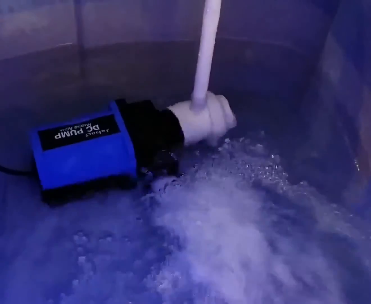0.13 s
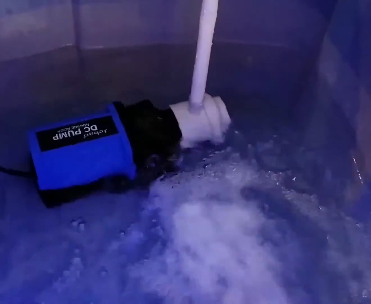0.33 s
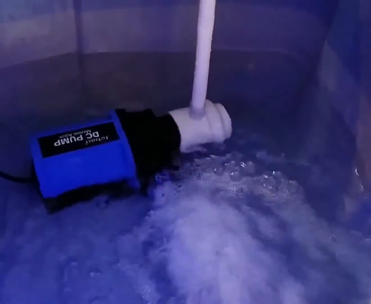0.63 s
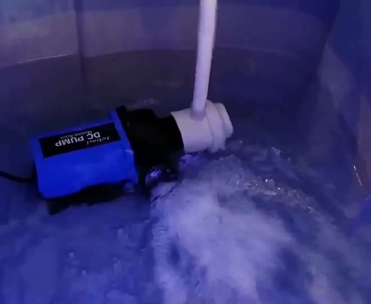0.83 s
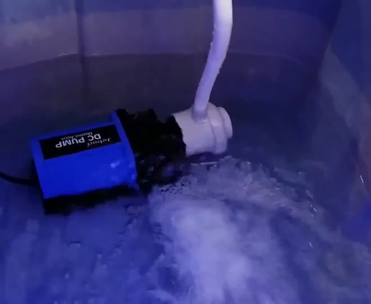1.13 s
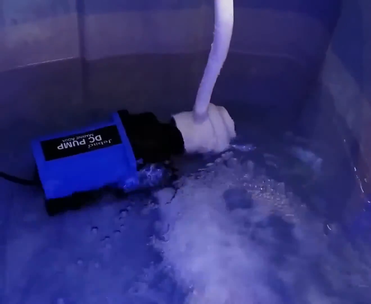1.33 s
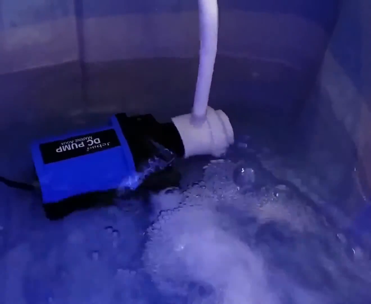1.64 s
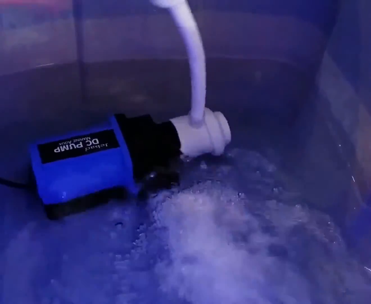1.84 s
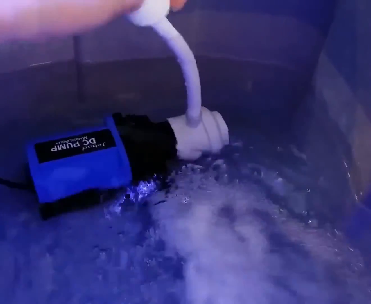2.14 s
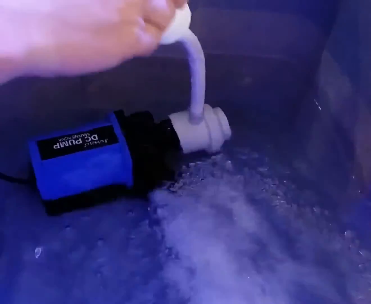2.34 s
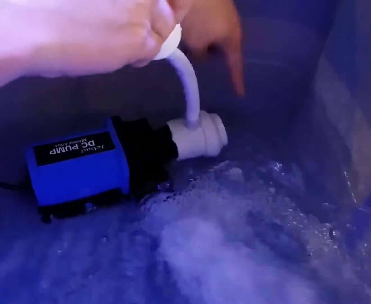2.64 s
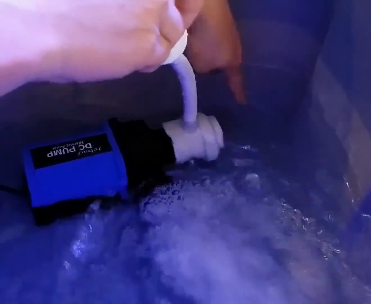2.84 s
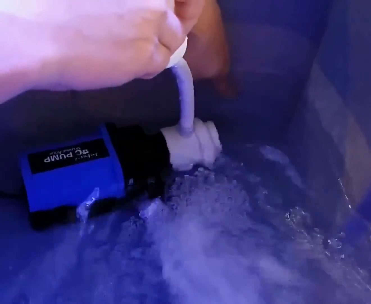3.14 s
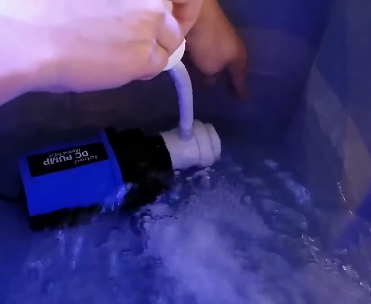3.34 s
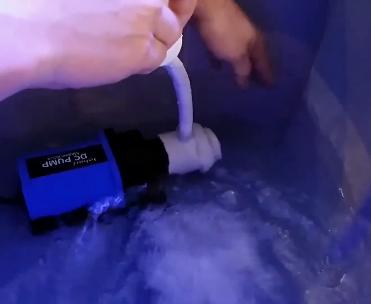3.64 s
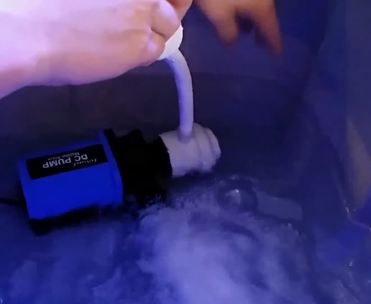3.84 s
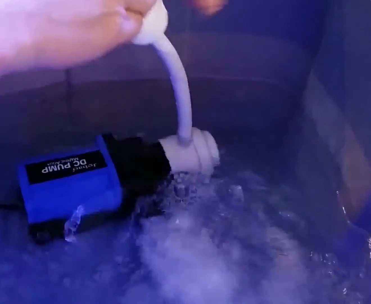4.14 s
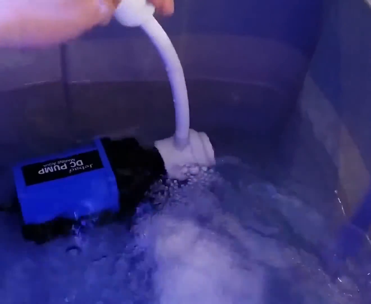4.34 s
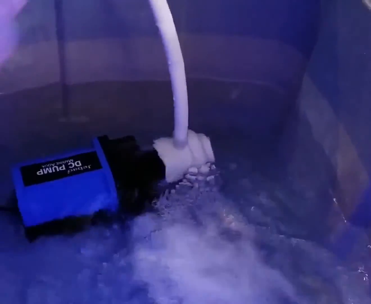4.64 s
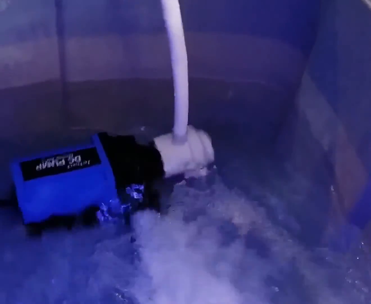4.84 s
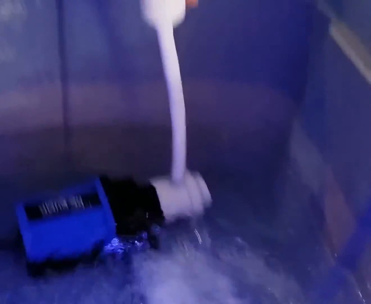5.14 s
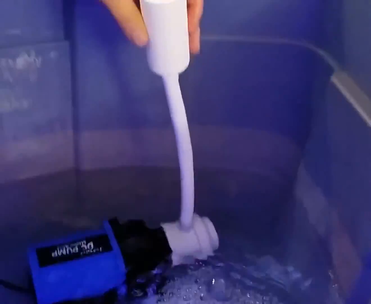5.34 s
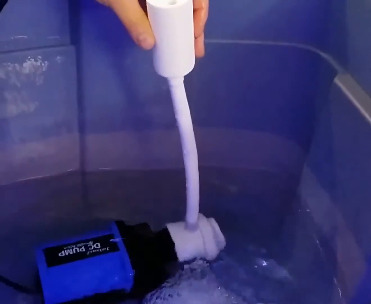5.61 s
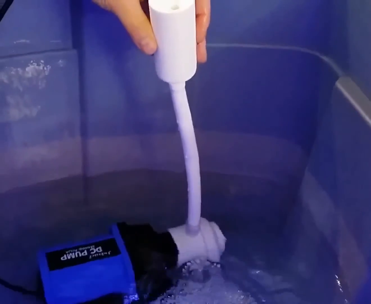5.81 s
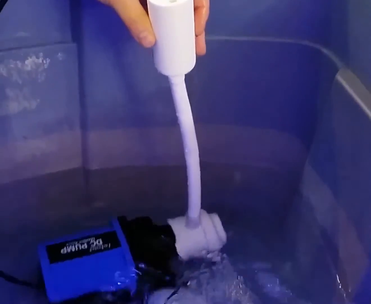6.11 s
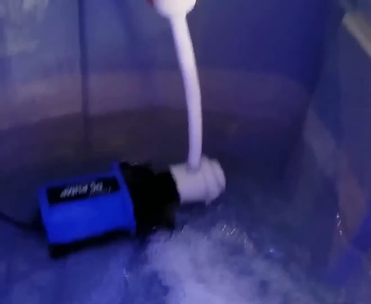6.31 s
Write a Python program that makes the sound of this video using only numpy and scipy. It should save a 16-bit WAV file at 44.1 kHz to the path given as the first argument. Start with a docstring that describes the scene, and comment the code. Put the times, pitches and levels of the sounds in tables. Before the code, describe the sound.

A small pump runs in a plastic tub of water, heard close and slightly right of centre, with quick wall echoes and a faint room tail. Throughout, a bubble jet rumbles low and unevenly, the housing whirrs, the motor sings thinly with a slight waver, and foam hisses with tiny pips. From 0 to 2 seconds, gulps of air snap, spurt and ring in short gargling rattles, densest around 1.2 to 1.4 and 1.75, with small slaps and splashes. From about 2 to 4.5 it is calmer: steady churning, soft low thumps near 2.4, 2.9 and 4.1, a few high ticks and faint bubbles. Shortly after 4.6 the crackly gargling returns, thick until about 5.3, then sparser with a splash near 5.7. From 6.0 to the end at about 6.5, a deep thump, gargles and rapid wet slaps crowd together.

```python
"""A small submersible pump runs in a plastic tub of water and sucks air down a hose.
From start to end its bubble jet rumbles (shaped noise), the housing whirrs, the motor sings and foam fizzes.
Gulps of air snap and ring in gargling bursts in the first two seconds; then it is calmer, with low thumps.
Shortly after 4.5 s the gargling returns, and from about 6 s water also slaps over the intake in quick
succession. Bubbles are short dying tones, splashes are bursts of noise, and the tub walls echo them."""
import sys
import numpy as np
from scipy import signal
from scipy.fft import rfft, irfft, next_fast_len
from scipy.io import wavfile
from scipy.ndimage import uniform_filter1d

SR = 44100
rng = np.random.default_rng(int(sys.argv[2]) if len(sys.argv) > 2 else 0)


def transcribe(signal):
    """Save signal, clipped to [-1, 1], as a 16-bit WAV file at the path in sys.argv[1]."""
    frames = np.atleast_2d(signal).T
    limited = np.clip(frames, -1, 1)
    pcm = np.round(limited * 32767).astype(np.int16)
    wavfile.write(sys.argv[1], SR, pcm)


N = 285229
T = np.arange(N) / SR
HZ = np.fft.rfftfreq(next_fast_len(N, True), 1 / SR)

# tone colour of the bubble jet: f/Hz, level/dB per Hz
JET_COLOUR = [(20, -33), (48, -32.5), (70, -17), (92, -16.5), (112, -11), (126, -14.5), (152, -5.5),
              (186, -3), (220, -7.5), (295, -2), (325, 1.5), (370, -4.5), (410, -14), (520, -22),
              (680, -36.5), (1300, -42.5)]
# tone colour of the sharp snap when air pinches off: f/Hz, level/dB per Hz
PINCH_COLOUR = [(400, -8), (1300, -29), (2300, -22), (4000, -42), (5500, 3), (8200, 5), (10500, -8.5),
                (16000, -25)]
# tone colour of splashing water: f/Hz, level/dB per Hz
SPLASH_COLOUR = [(200, -6), (520, 0), (800, -9.5), (1300, -12.5), (1750, -0.5), (2300, -0.5), (3000, -7),
                 (4000, -6), (5000, -36), (7000, -47)]
# the hose and the impeller chamber colour every burst of air: f/Hz, level/dB per Hz
CHAMBER_COLOUR = [(600, -48), (1400, -9), (1850, -10), (2400, 11), (3000, -11), (3800, 9), (5000, 10),
                  (7000, 7.5), (12000, -21.5)]
# how much air the jet carries, before each source takes its share: t/s, level/dB
AIR_FLOW = [(0, 1), (0.6, -0.5), (1.1, -1), (1.8, 1), (2.3, -2.5), (3.1, -1.5), (3.9, 3), (4.4, 2.5),
            (5.15, 0), (5.7, 0.5), (6.3, 0.5), (6.47, -2)]
FLOW_DB = np.interp(T, *np.transpose(AIR_FLOW))


def churn(low_db=-29.0, high_db=-32.0, split_hz=250, steadiness=0.92):
    """The bubble cloud pulsates at random; its modes follow the flow, and shift up or down in each surge."""
    # moments when the jet surges: start t/s, length t/s, change of lower modes level/dB, of upper modes level/dB
    surges = [(0.224, 0.022, -1.5, 9), (1.92, 0.21, 3, 4), (2.562, 0.12, 5, 4), (3.21, 0.5, 1.5, 0.5),
              (6.08, 0.16, 2, -2)]
    surge_db = np.zeros((2, N))
    for s, length, *changes_db in surges:
        surge_db += np.outer(changes_db, spell(T - s, length))
    shape = gain_of(read(JET_COLOUR))
    upper = 1 / (1 + (split_hz / (HZ + 1)) ** 12)
    out = np.zeros((2, N))
    for part, db in [(1 - upper, low_db + surge_db[0]), (upper, high_db + surge_db[1])]:
        cloud = noise(shape * np.sqrt(part))
        # the pump feeds the cloud at an even rate, so slow level changes are mostly levelled out
        slow_power = uniform_filter1d(cloud[0] ** 2, SR // 10) + 1e-6
        steady = evened(cloud / slow_power ** (steadiness / 2))
        out += steady * gain_of(FLOW_DB + db)
    return out


def gulps(ring_db=-9.5, spurt_db=-8.0, snap_db=5.0, snap_s=0.00097, spurt_s=0.00048, spatter_db=-4.0, reach=1.87):
    """A slug of air pinches off with a sharp snap, spurts through the chamber and leaves a ringing bubble."""
    # single gulps, levels before the settings above: t/s, level/dB, bubble pitch f/Hz, snap level/dB
    slugs = [(0.0665, -8, 5060, -22), (0.2669, -18.5, 2060, -20), (0.3004, -8, 4400, -16.5),
             (0.4236, -11.5, 5440, -27), (0.4404, -14.5, 5950, -23.5), (0.4544, -13.5, 3960, -27),
             (0.5847, -16.5, 2360, -41), (0.6115, -16, 3430, -30), (0.6264, -20.5, 2350, -35),
             (0.6435, -22, 4700, -45), (0.9918, -12, 5150, -31), (1.1546, -8.5, 3344, -19.5),
             (1.167, -4, 4500, -32), (1.1834, -10, 3800, -33), (1.1915, -15, 4300, -24),
             (1.2031, -14, 4060, -26), (1.2125, -22, 3980, -25), (1.262, -10, 3620, -24.5),
             (1.276, -10, 3540, -23), (1.3775, -12, 3240, -15.5), (1.4654, -32, 2270, -27),
             (1.492, -32, 2300, -21.5), (1.7442, -7.5, 3730, -15.5), (1.7745, -9.5, 3580, -19),
             (1.7835, -10, 3580, -20), (1.7925, -16, 3540, -18), (1.8543, -11, 3610, -50),
             (2.176, -22, 1890, -23), (4.283, -17, 1930, -32), (4.5895, -9.5, 8500, -26),
             (4.5974, -23, 5800, -22), (4.7833, -20, 2620, -19.5), (4.7941, -14, 5300, -27),
             (4.8075, -27, 2360, -24), (4.857, -8.5, 4570, -19), (4.8653, -6, 4240, -22),
             (4.9275, -13, 2680, -34), (4.9365, -11, 4300, -26), (5.0632, -13.5, 2980, -29),
             (5.0885, -15, 2680, -39), (5.1065, -14, 2400, -28), (5.119, -16, 2260, -19.5),
             (5.1305, -12, 3850, -18), (5.1438, -27, 2280, -21), (5.182, -17, 2300, -23.5),
             (5.1894, -13, 2390, -17), (5.209, -11.5, 3080, -40), (5.3105, -13.5, 4050, -50),
             (5.9308, -12, 2700, -53), (6.0378, -22, 3900, -19.5), (6.21, -4.5, 5040, -47),
             (6.2652, -9, 4500, -15), (6.277, -10, 4560, -28.5), (6.316, -4.5, 1754, -48),
             (6.3975, -23, 3530, -24.5)]
    bodies, snaps, spurts = np.zeros((3, 5, N))  # five spots on the water
    t = np.arange(SR // 60) / SR
    bursts = np.sign(rng.standard_normal((len(slugs), 2, len(t))))
    delays = rng.uniform(0.0096, 0.016, len(slugs))
    for k, (s, level_db, hz, crack_db) in enumerate(slugs):
        spot = k % len(bodies)
        spurt = gain_of(level_db + spurt_db) * bursts[k, 0] * np.exp(-t / spurt_s)
        cutoff_hz = min(reach * hz, 0.45 * SR)  # larger slugs sound duller
        spurt = signal.lfilter(*signal.butter(2, cutoff_hz, fs=SR), spurt)
        ring = bubble(hz, cycles=9.0, rise=-0.038)
        add(bodies[spot], s, gain_of(level_db + ring_db) * ring)
        add(spurts[spot], s, spurt)
        add(spurts[spot], s + delays[k], gain_of(spatter_db) * spurt)  # the tail of the slug follows
        add(snaps[spot], s, gain_of(crack_db + snap_db) * bursts[k, 1] * np.exp(-t / snap_s))
    air = bodies + colour(spurts, CHAMBER_COLOUR)
    body = tub(air, walls_db=-2.5, walls_t60=0.05, room_db=-11, room_t60=0.4)
    snap = tub(colour(snaps, PINCH_COLOUR), walls_db=-5, walls_t60=0.04, room_db=-12, room_t60=0.3)
    return body + snap


def gargle(ring_db=-4.5, spray_db=-3.5, snap_db=-9.5, per_s=1200, spread_db=3.0, scatter=0.138):
    """The impeller chops incoming air into a rattle of small bubbles, each a snap, a spurt and a short ring."""
    rings, snaps = np.zeros((2, 2, N))
    draws = rng.random((int(per_s * N / SR), 4))
    times = draws[:, 0] * N / SR
    air, pitch = air_intake()
    pitches = np.interp(times, T, pitch)
    for k, (s, hz, (_, size, a, b)) in enumerate(zip(times, pitches, draws)):
        hz *= np.exp(2 * scatter * (a - b))
        hz *= 1.62 if k % 3 == 0 else 0.96  # some split off as smaller bubbles
        strength = gain_of(spread_db * min(-np.log(size), 3)) * (-1) ** k
        ring = bubble(hz, cycles=7.6, rise=0.015)
        spot = int(2 * a)
        add(rings[spot], s, strength * ring / np.linalg.norm(ring))
        add(snaps[spot], s, np.array([strength]))
    snaps = evened(snaps)
    rattle = gain_of(ring_db) * evened(rings)
    rattle += gain_of(spray_db) * colour(snaps, CHAMBER_COLOUR)
    rattle += gain_of(snap_db) * colour(snaps, PINCH_COLOUR)
    rattle *= air * chop() / 2
    return tub(rattle, walls_db=0.0, walls_t60=0.05, room_db=-13.0, room_t60=0.34)


def air_intake(trickle_db=-52.5, trickle_hz=4100, sag_octaves_per_s=2.9):
    """Strength and bubble pitch of the air: a steady trickle plus runs, the strongest weighing most in the pitch."""
    # runs of air that the impeller swallows: start t/s, length t/s, level/dB, pitch halfway through f/Hz
    air_runs = [(-0.015, 0.043, -30, 3210), (0.093, 0.084, -38.5, 2720), (0.264, 0.07, -37, 2620),
                (0.427, 0.038, -32, 3760), (0.602, 0.051, -34.5, 2880), (0.761, 0.074, -37, 4200),
                (1.001, 0.017, -33, 3750), (1.151, 0.09, -32, 2740), (1.317, 0.11, -34, 2140),
                (1.348, 0.085, -31.5, 3060), (1.412, 0.085, -36, 2330), (1.715, 0.048, -31.5, 3280),
                (1.772, 0.031, -29, 3110), (3.925, 0.09, -44, 3930), (4.137, 0.03, -44, 3750),
                (4.621, 0.014, -31, 2590), (4.772, 0.027, -26.5, 2680), (4.908, 0.029, -28.5, 2810),
                (5.079, 0.15, -27.5, 2460), (5.218, 0.11, -35.5, 2290), (5.751, 0.043, -32.5, 2540),
                (6.037, 0.11, -31.5, 2310), (6.182, 0.12, -30.5, 2380), (6.287, 0.17, -37.5, 1900)]
    power = np.full(N, gain_of(trickle_db) ** 2)
    pitch = power * trickle_hz
    for s, length, db, hz in air_runs:
        run = (gain_of(db) * spell(T - s, length)) ** 2
        from_middle = np.clip(T - s, 0, length) - length / 2
        power += run
        pitch += run * hz * 2 ** (-sag_octaves_per_s * from_middle)  # bubbles grow, so their pitch sags
    return np.sqrt(power), pitch / power


def chop(per_s=80, jitter=0.3, decay_s=0.0026, floor=0.27):
    """The impeller bites the air off in uneven pulses: a gain of rms 1 that jumps at each bite and falls back."""
    gaps = np.exp(jitter * rng.standard_normal(1500)) / per_s
    bites = np.cumsum(gaps) - gaps[0]
    age = T - bites[np.searchsorted(bites, T, "right") - 1]
    return evened(floor + np.exp(-age / decay_s))


def thumps(db=-2.0):
    """Large air pockets break off and ring for a cycle or two inside the bubble cloud."""
    # large pockets, levels before db and the jet's colour: t/s, level/dB, pitch f/Hz
    big_pockets = [(1.295, -9, 182), (1.933, -5.5, 173), (2.376, -8.5, 185), (2.87, -8.5, 165),
                   (3.852, -9, 307), (4.074, -3.5, 166), (4.755, -5.5, 275), (5.757, -7.5, 244),
                   (6.091, -2.5, 207)]
    out = np.zeros(N)
    for s, level_db, hz in big_pockets:
        pocket = bubble(hz, cycles=2.16, rise=0.0082)
        onset = 1 - np.exp(-np.arange(len(pocket)) * hz / SR * 4)
        add(out, s, gain_of(level_db + db) * pocket * onset)
    return filtered(out, gain_of(read(JET_COLOUR)))


def slaps(cycles=7.6, scatter=0.04, stagger_s=0.0015, splat_db=-7.5, splat_s=0.0028):
    """Water slaps shut over the intake: a short splat, and a trapped air pocket of varying size that rings."""
    # single slaps: t/s, lower modes level/dB, upper modes level/dB
    slap_times = [(0.221, -29, -33), (0.558, -36, -29.5), (1.3149, -23, -27), (1.3637, -20, -27),
                  (5.209, -26, -27), (6.0378, -27, -24), (6.0496, -19, -21), (6.0647, -14, -23),
                  (6.0784, -26, -30), (6.1033, -19, -21), (6.1164, -19.5, -24), (6.128, -23.5, -20),
                  (6.1836, -21, -16), (6.1954, -21, -24), (6.2287, -25, -21), (6.2468, -19, -25),
                  (6.277, -20, -25), (6.2844, -18, -31), (6.316, -15, -30), (6.342, -20, -29),
                  (6.39, -22, -30)]
    # lower modes of the air pocket, levels within a slap: f/Hz, level/dB
    lower_modes = [(1850, -2.5), (2330, -9.5)]
    # upper modes of the air pocket, levels within a slap: f/Hz, level/dB
    upper_modes = [(3200, -8), (3800, 1), (4500, -4), (5100, -1.5)]
    rings, splats = np.zeros((2, 3, N))  # three spots on the water
    t = np.arange(SR // 40) / SR
    for k, (s, lower_db, upper_db) in enumerate(slap_times):
        spot = k % len(rings)
        for modes, level_db in [(lower_modes, lower_db), (upper_modes, upper_db)]:
            for hz, db in modes:
                ring = bubble(hz * np.exp(scatter * rng.uniform(-0.94, 1)), cycles, rise=0)
                add(rings[spot], s + stagger_s * rng.random(), gain_of(level_db + db) * ring)
        splat = rng.standard_normal(len(t)) * np.exp(-t / splat_s)
        add(splats[spot], s, gain_of((lower_db + upper_db) / 2 + splat_db) * splat)
    water = rings + colour(splats, SPLASH_COLOUR)
    return tub(water, walls_db=-4, walls_t60=0.045, room_db=-13, room_t60=0.34)


def slop(db=10.0, lapping_db=-68):
    """Lumpy splashing where the surface folds over against the pump, with faint lapping in between."""
    # splashes, levels before db: start t/s, length t/s, level/dB
    splashes = [(1.336, 0.15, -54.5), (1.768, 0.13, -47.5), (5.187, 0.41, -55.5), (5.657, 0.32, -51.5),
                (6.043, 0.091, -41), (6.19, 0.2, -41.5)]
    level = np.full(N, gain_of(lapping_db))
    for s, length, level_db in splashes:
        level += gain_of(level_db) * spell(T - s, length)
    water = noise(gain_of(read(SPLASH_COLOUR)))
    return water * level * gain_of(db) * lumpy(depth_db=8.0, rate_hz=26)


def glugs(cycles=9.1, damping=0.22):
    """Single bubbles surface, some with a clear note, the tiniest as short high ticks."""
    # surfacing bubbles: t/s, level/dB, pitch f/Hz
    surfacing_bubbles = [(0.056, -26, 2760), (0.122, -26, 3230), (0.133, -19, 7200), (1.522, -25, 4100),
                         (1.691, -28, 4500), (1.734, -15, 6240), (2.95, -16, 10000), (3.329, -21, 9700),
                         (2.994, -34, 1910), (3.49, -35, 2400), (3.612, -33, 856), (3.66, -35, 866),
                         (3.689, -13.5, 7600), (3.709, -35, 2250), (3.84, -27, 4430), (3.976, -23, 3980),
                         (4.225, -32, 1900), (4.86, -23, 1906), (5.071, -27, 2720), (6.302, -22, 2670)]
    out = np.zeros((1, N))
    for s, level_db, hz in surfacing_bubbles:
        size = 3000 / hz  # 1 for a bubble that rings at 3000 Hz
        add(out, s, gain_of(level_db) * bubble(hz, cycles * size ** damping, rise=0.0074))
    return tub(out, walls_db=-5.0, walls_t60=0.045, room_db=-15.0, room_t60=0.3)


def whirr(db=-3.5, flow_share=1.4, count=3):
    """Turbulence in the impeller keeps the housing humming, harder with the flow; resonances waver in groups."""
    # resonances of the pump housing, levels before db and flow: f/Hz, width f/Hz, level/dB
    resonances = [(568, 19, -54.5), (832, 35, -57.5), (914, 34, -55), (1123, 110, -57.5),
                  (1445, 120, -55.5), (1780, 40, -53.5), (1960, 68, -52.5), (2600, 130, -53.5),
                  (4000, 770, -52)]
    out = np.zeros((2, N))
    for k in range(count):
        power = np.zeros(len(HZ))
        for hz, width, level_db in resonances[k::count]:
            peak = 1 / (1 + ((HZ - hz) / width) ** 2) ** 1.44
            power += (gain_of(level_db) * evened(peak)) ** 2
        hum = noise(np.sqrt(power)) * np.sqrt(np.mean(power))
        out += hum * lumpy(depth_db=4.0, rate_hz=18)
    return out * gain_of(db + flow_share * FLOW_DB)


def whine(db=0.0, waver=0.00602, flow_share=1.2):
    """The motor sings faintly, louder with the flow; its speed wavers a little at random."""
    # tones of the running motor, levels before the flow: f/Hz, level/dB
    motor_tones = [(565, -74), (910, -62.5), (1056, -66), (1100, -63.5), (4430, -61)]
    speed = 1 + waver * drift(21.0)
    turns = np.cumsum(speed) / SR
    out = np.zeros(N)
    for hz, level_db in motor_tones:
        tone = np.sin(2 * np.pi * (hz * turns + rng.random()))
        out += gain_of(level_db) * evened(tone * lumpy(depth_db=7.5, rate_hz=13.0))
    return out * gain_of(db + flow_share * FLOW_DB)


def foam(db=-46.0, flow_share=0.033, hiss_db=4.5, pops_db=-0.5, per_s=300, spread_db=1.0, tiniest_hz=9700):
    """Countless tiny bubbles burst as a hiss; the nearer ones are separate pips."""
    # tone colour of the foam's hiss: f/Hz, level/dB per Hz
    fizz_colour = [(300, 7), (650, 5.5), (1100, 6), (1300, 0.5), (1650, -1), (2200, 3.5), (3200, 5),
                   (4500, 4), (5600, -0.5), (7500, 1.5), (9400, 0.5), (11000, -3.5), (16000, -11.5)]
    froth = noise(gain_of(read(fizz_colour)))
    froth = tub(froth, walls_db=2.0, walls_t60=0.059, room_db=-4.5, room_t60=0.57)
    hiss = evened(froth) * gain_of(hiss_db) * lumpy(depth_db=2.3, rate_hz=230)
    spots = np.zeros((4, N))
    for k, (when, pitch, size) in enumerate(rng.random((int(per_s * N / SR), 3))):
        pip = bubble(tiniest_hz / (1 + 1.8 * pitch), cycles=13, rise=0.015)
        add(spots[k % len(spots)], when * N / SR, pip * gain_of(spread_db * min(-np.log(size), 4)))
    pops = evened(tub(spots, walls_db=6.0, walls_t60=0.04, room_db=-14.0, room_t60=0.27))
    return (hiss + gain_of(pops_db) * pops) * gain_of(db + flow_share * FLOW_DB)


def tub(spots, walls_db, walls_t60, room_db, room_t60):
    """Each spot on the water has its own quick echoes from the tub walls, then a faint room tail."""
    t = np.arange(SR // 3) / SR
    out = np.zeros((2, N))
    for spot in spots:
        dense, chance = rng.standard_normal((2, len(t))), rng.random((2, len(t)))
        # sparse clicks for the walls, dense noise for the room; each falls 60 dB in its t60 seconds
        walls = np.sign(dense) * (chance < 0.07) * (t > 0.0008) * gain_of(-60 * t / walls_t60)
        room = dense * (t > 0.008) * gain_of(-60 * t / room_t60)
        echo = np.zeros((2, len(t)))
        for db, part in [(walls_db, walls), (room_db, room)]:
            echo += gain_of(db) * part / np.linalg.norm(part, axis=1, keepdims=True)
        echo[0, rng.integers(1, 4)] += 1
        echo[1, 0] += 1  # the direct sound reaches the right side first
        out += signal.oaconvolve(spot[None], echo, axes=1)[:, :N]
    return out


def bubble(hz, cycles, rise):
    """A bubble's ring fades by 1/e in the given cycles; its pitch climbs (or sinks, if rise is negative)."""
    age = np.arange(int(6 * cycles / hz * SR)) * hz / SR / cycles
    return np.exp(-age) * np.sin(2 * np.pi * cycles * (age + rise * age ** 2 / 2))


def spell(age, length, attack_s=0.011, hold_rise_db_per_s=1, release_s=0.0258):
    """Envelope of a run of air or water: fast attack, a very slightly rising hold that goes on, then a release."""
    age = np.maximum(age, 0)
    attack = np.minimum(age / attack_s, 1)
    release = np.exp(-np.maximum(age - length, 0) / release_s)
    return attack * gain_of(hold_rise_db_per_s * age) * release


def noise(gain):
    """Stereo noise of the given spectrum: alike in the bass, unrelated in the treble."""
    # how alike left and right are: f/Hz, likeness (1 = the same, 0 = unrelated)
    likeness = [(25, 0.9), (70, 0.99), (290, 0.96), (640, 1), (1400, 0), (5000, 0)]
    a, b = rng.standard_normal((2, N))
    same = np.clip(read(likeness), -1, 1)
    left = filtered(a, gain)
    right = filtered(a, gain * same) + filtered(b, gain * np.sqrt(1 - same ** 2))
    return evened(np.array([left, right]))


def lumpy(depth_db, rate_hz):
    """A gain of rms 1 that flutters at random, within bounds."""
    return evened(gain_of(depth_db * 2 * np.tanh(drift(rate_hz) / 2)))


def drift(hz):
    """Slow random motion of rms 1, up to roughly the given rate."""
    return evened(filtered(rng.standard_normal(N), 1 / (1 + (HZ / hz) ** 4)))


def colour(x, points):
    """Filter with the given spectrum and a mean power gain of 1 that never sounds ahead of its input."""
    size = next_fast_len(N, True)
    # folding the cepstrum (the spectrum of the log spectrum) onto positive times gives minimum phase
    cepstrum = irfft(np.log(evened(gain_of(read(points)))), size)
    cepstrum[1:size // 2] *= 2
    cepstrum[size // 2:] = 0
    return filtered(x, np.exp(rfft(cepstrum)))


def filtered(x, gain):
    """Applies a gain to each frequency."""
    size = next_fast_len(N, True)
    return irfft(rfft(x, size) * gain, size)[..., :N]


def read(points):
    """A table over frequency, joined on a log axis."""
    hz, value = np.transpose(points)
    return np.interp(np.log(HZ + 1), np.log(hz + 1), value)


def gain_of(db):
    """Decibels to amplitude."""
    return 10 ** (np.asarray(db) / 20)


def evened(x):
    """Scales to rms 1."""
    return x / np.sqrt(np.mean(x ** 2) + 1e-20)


def add(mix, s, sound):
    """Mixes a sound in at time s, in seconds."""
    part = mix[..., max(round(s * SR), 0):][..., :sound.shape[-1]]
    part += sound[..., :part.shape[-1]]


def lean(x, right_db):
    """Sets how much louder the right side is than the left, by one amount or by frequency."""
    return filtered(x, gain_of(np.array([[-0.5], [0.5]]) * right_db))


def scene(balance_db=3):
    """Everything in the tub, a little to the right."""
    # the pump body shades the intake from one side, before the overall balance: f/Hz, right minus left level/dB
    body_shade = [(1600, 4.5), (2400, 0.5), (4000, 4), (5500, -5.5), (8000, -1.5), (13000, 12.5)]
    intake = lean(gulps(), read(body_shade))
    jet = churn() + thumps()
    water = slaps() + slop() + glugs()
    pump = whirr() + whine()
    return lean(jet + intake + gargle() + water + pump + foam(), balance_db)


def record(dry, edge_hz=16050):
    """Takes away the treble above the edge with a steep low-pass filter."""
    low_pass = signal.firwin(511, edge_hz, window=("kaiser", 9), fs=SR)
    return signal.oaconvolve(dry, low_pass[None], "same")


dry = scene()
out = record(dry)
transcribe(out)
```